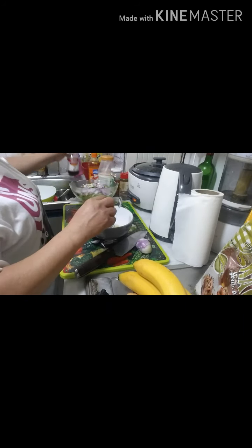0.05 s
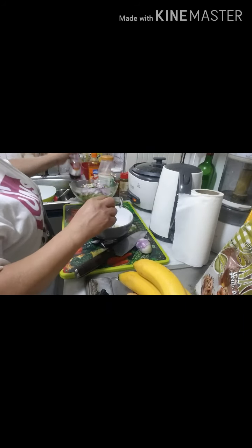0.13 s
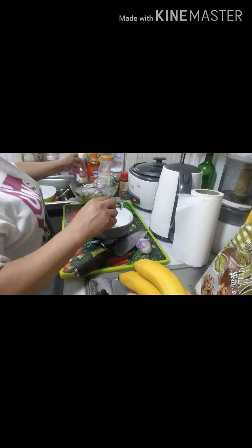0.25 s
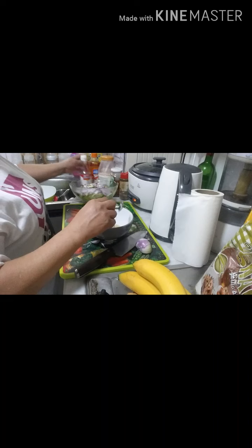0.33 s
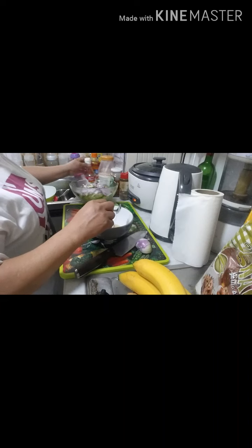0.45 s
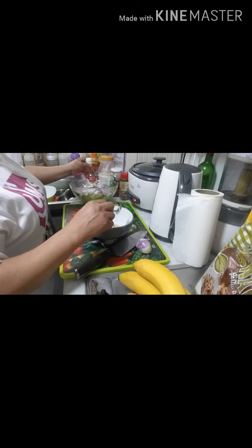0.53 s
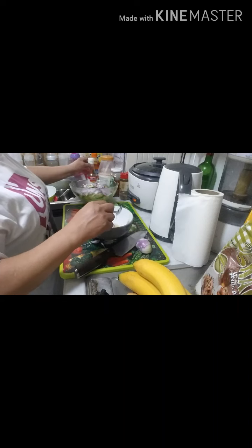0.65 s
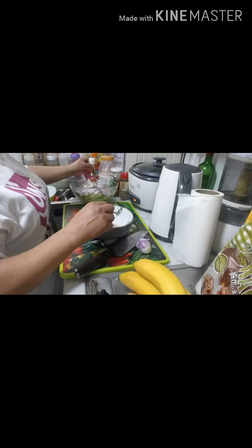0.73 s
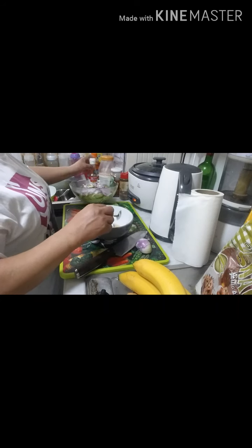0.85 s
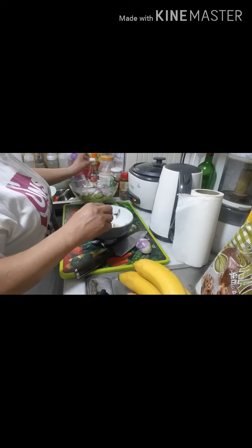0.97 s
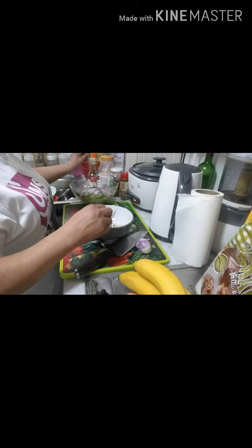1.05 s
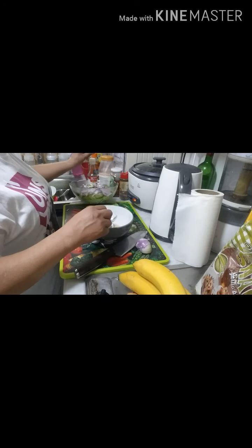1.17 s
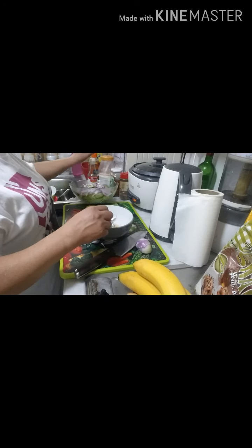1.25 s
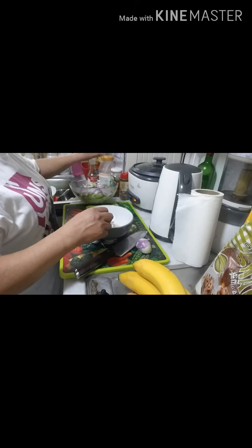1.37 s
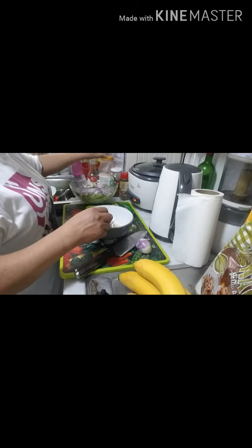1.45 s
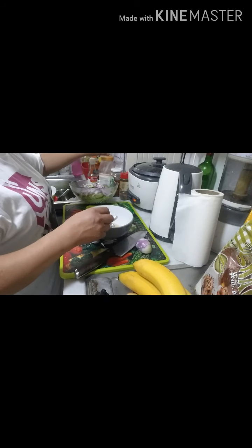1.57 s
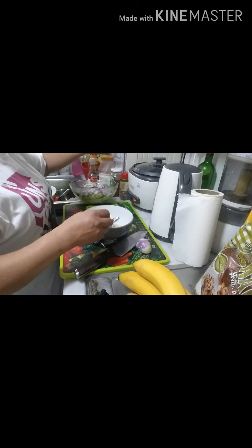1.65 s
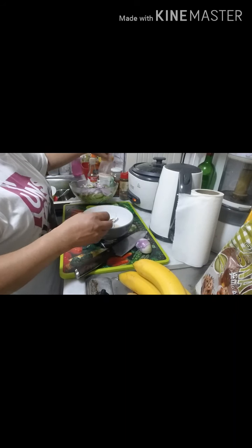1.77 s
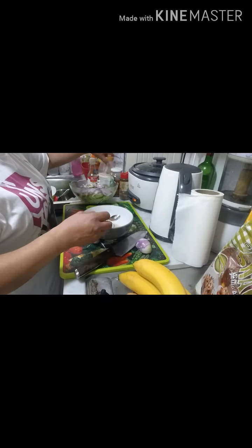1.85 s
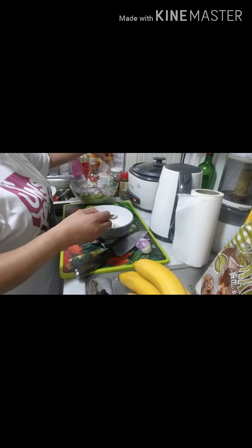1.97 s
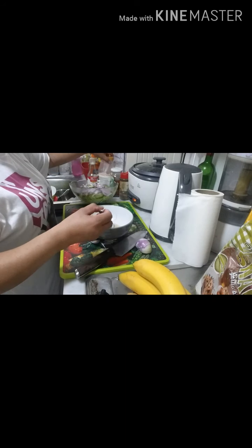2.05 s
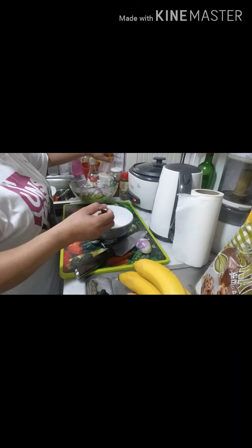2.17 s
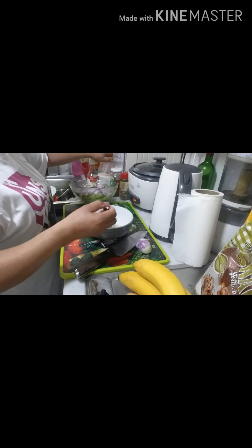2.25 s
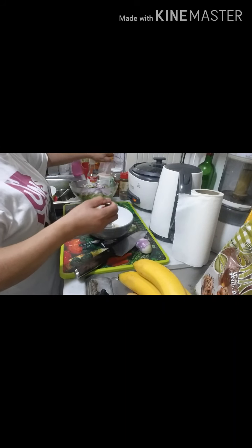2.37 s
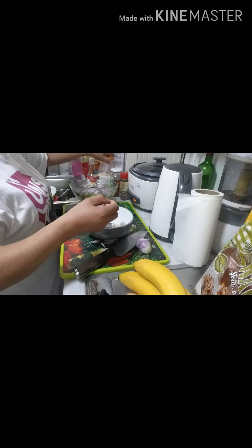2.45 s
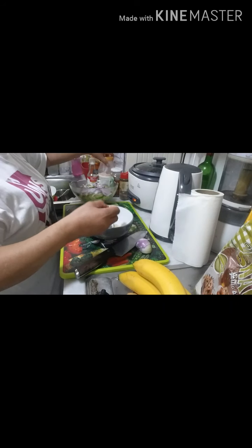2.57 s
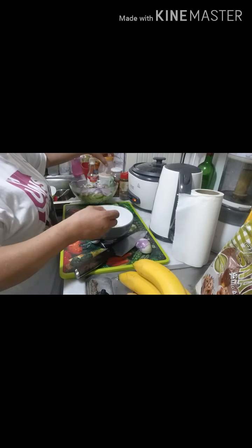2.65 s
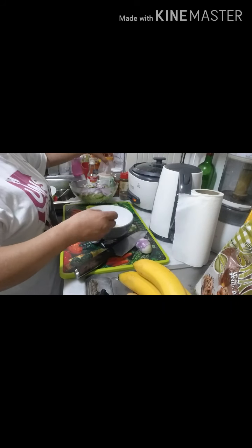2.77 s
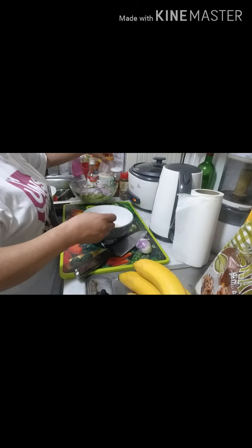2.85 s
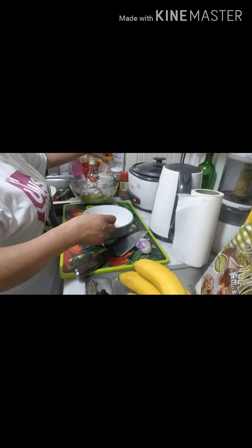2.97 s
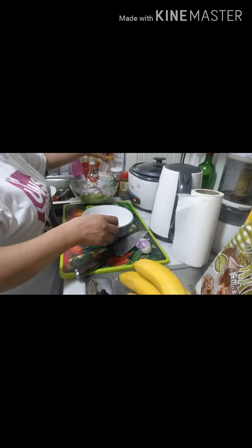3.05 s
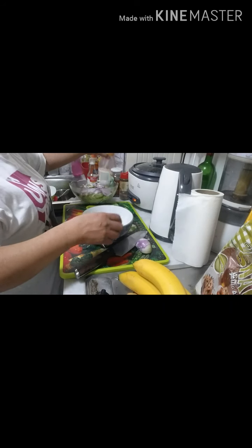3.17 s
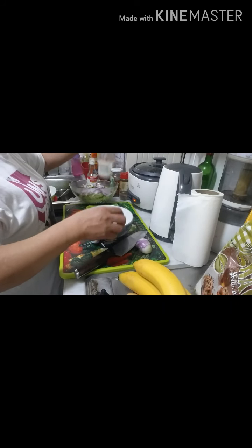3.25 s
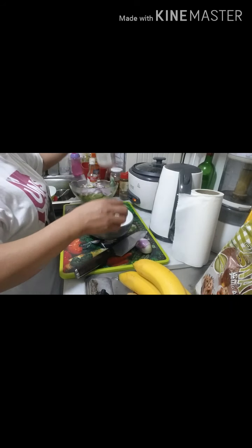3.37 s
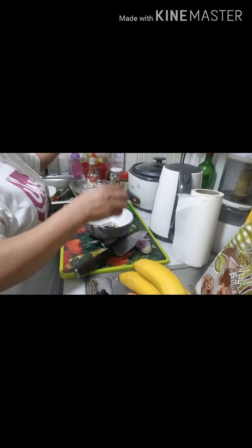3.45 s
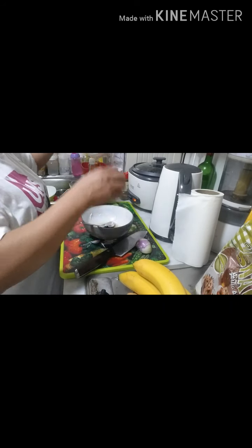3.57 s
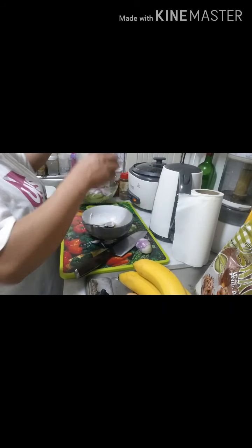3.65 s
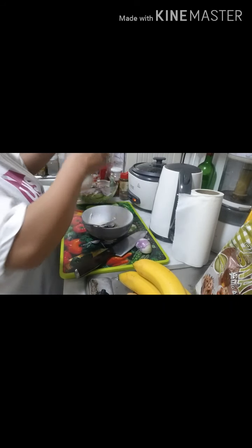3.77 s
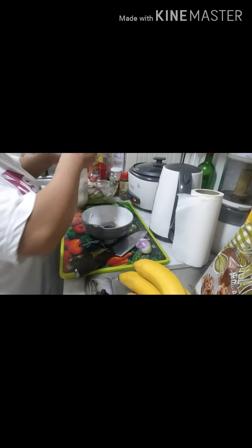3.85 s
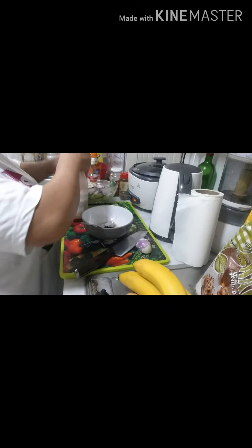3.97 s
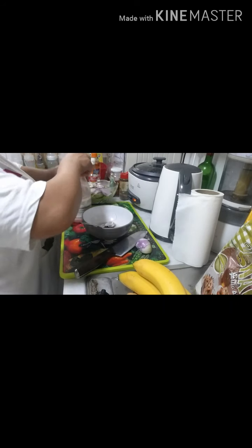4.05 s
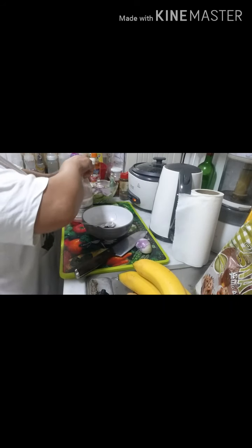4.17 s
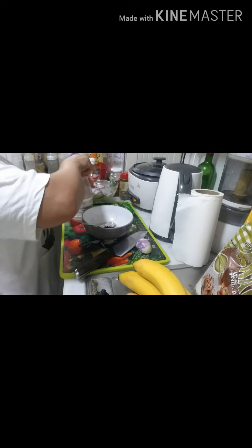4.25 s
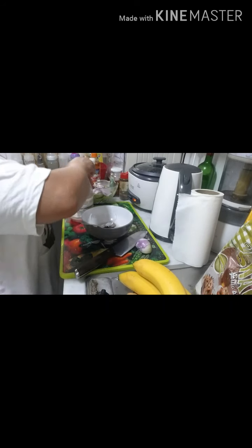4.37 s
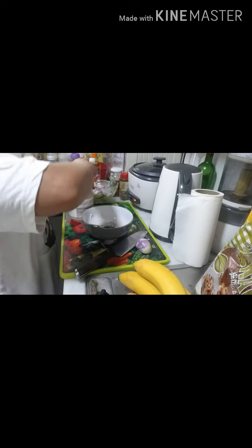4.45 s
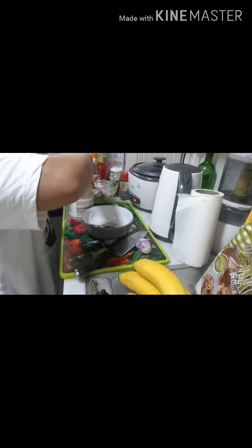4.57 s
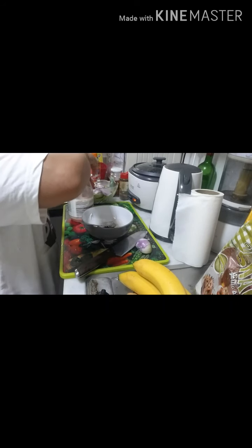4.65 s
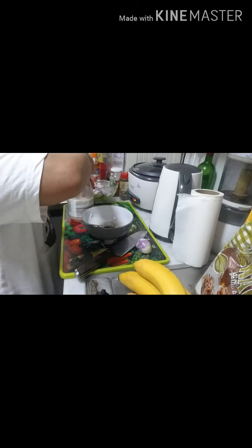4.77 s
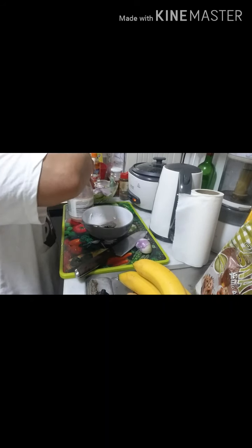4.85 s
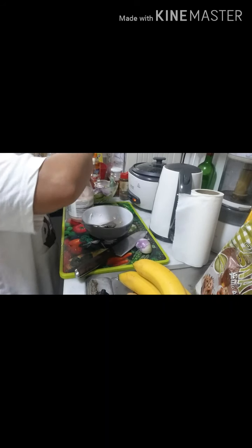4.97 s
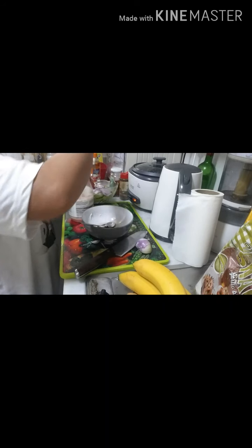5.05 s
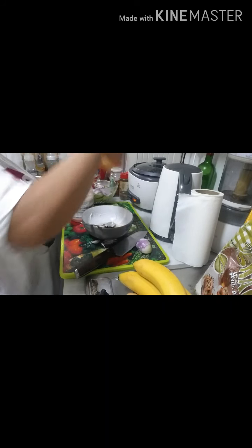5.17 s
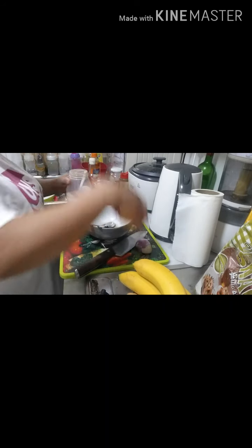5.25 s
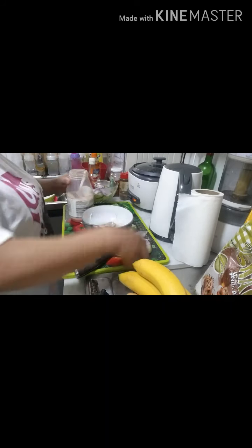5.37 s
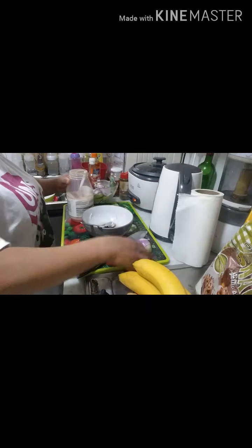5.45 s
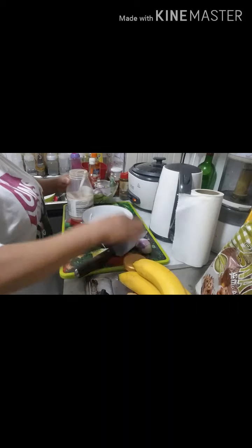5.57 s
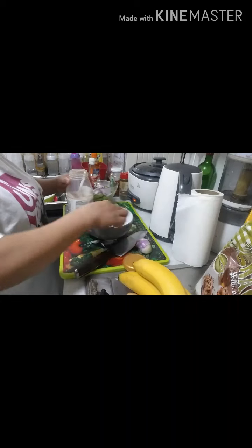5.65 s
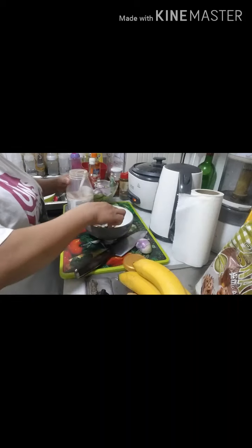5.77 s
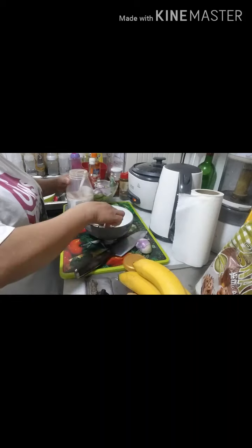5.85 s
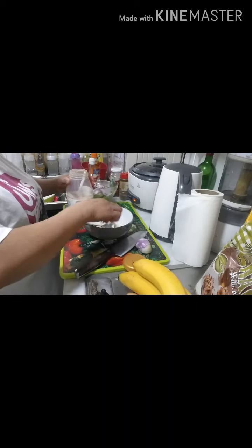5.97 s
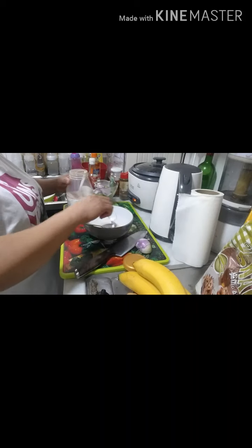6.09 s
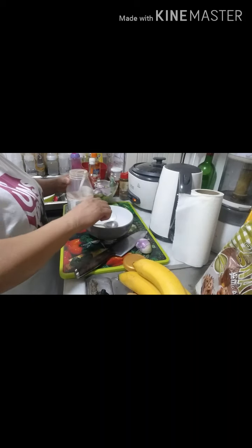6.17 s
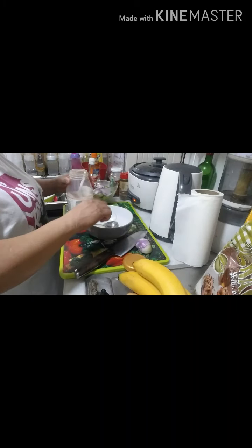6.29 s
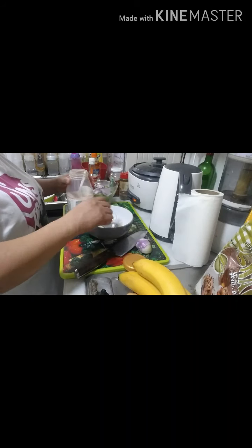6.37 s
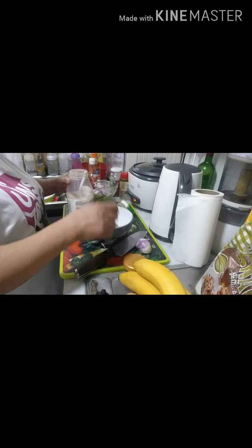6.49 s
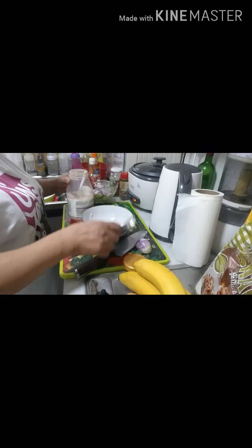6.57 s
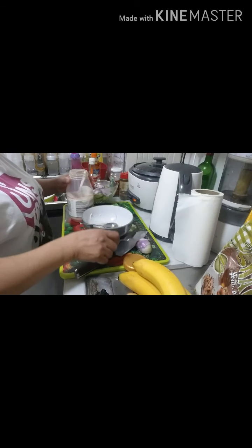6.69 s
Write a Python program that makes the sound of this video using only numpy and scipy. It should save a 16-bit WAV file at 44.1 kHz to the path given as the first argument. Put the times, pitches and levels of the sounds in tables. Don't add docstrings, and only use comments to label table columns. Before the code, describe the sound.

A metal spoon chatters brightly in a glazed bowl, the bowl lands firmly, jars bump and a lid knocks down over a steady appliance hum.

```python
import sys
import numpy as np
from scipy import signal
from scipy.fft import rfft, irfft
from scipy.io import wavfile
from scipy.ndimage import uniform_filter1d

SR = 44100
rng = np.random.default_rng(int(sys.argv[2]) if len(sys.argv) > 2 else 0)


def undo_db(level):
    steps = np.asarray(level, float) / 20
    return 10 ** steps


def file_out(sig):
    cols = np.atleast_2d(sig).T
    lim = np.clip(cols, -1, 1)
    pcm = np.round(lim * 32767).astype(np.int16)
    wavfile.write(sys.argv[1], SR, pcm)


N = 296604


def evened(x):
    return x / np.sqrt(np.mean(x ** 2) + 1e-20)


def read(points, hz):
    f, value = np.transpose(points)
    return np.interp(np.log(hz + 1), np.log(f + 1), value)


def add(mix, s, sound):
    part = mix[..., round(s * SR):][..., :sound.shape[-1]]
    part += sound[..., :part.shape[-1]]


def colour(points, tilt_db=0., body_hz=1000., body_db=0.):
    hz = np.fft.rfftfreq(2048, 1 / SR)
    level_db = read(points, hz) + tilt_db * np.log2(np.clip(hz, 200, 12000) / 2000)
    level_db += body_db / (1 + ((hz - body_hz) / (body_hz / 5)) ** 2)
    cepstrum = irfft(np.log(undo_db(np.maximum(level_db, -100))))
    cepstrum[1:1024] *= 2
    cepstrum[1025:] = 0
    taps = irfft(np.exp(rfft(cepstrum)))[:1024]
    return taps / np.linalg.norm(taps)


def chatter(t60, spread_db=1.5, rise=0.0015):
    t = np.arange(round(.4 * SR)) / SR
    uneven_db = spread_db * np.minimum(rng.exponential(1, len(t)), 5)
    ticks = rng.standard_normal(len(t)) * undo_db(uneven_db)
    return evened(ticks) * undo_db(-60 * t / max(t60, .003)) * (1 - np.exp(-t / rise))


def stroke_db(t, start, length, rise_db, in_db_per_s, out_db_per_s):
    climb = rise_db * (np.clip((t - start) / max(length, .001), 0, 1) - 1)
    set_in = in_db_per_s * np.maximum(start - t, 0)
    let_go = out_db_per_s * np.maximum(t - start - length, 0)
    return climb - set_in - let_go


def knocks(events, points, rise, blow, hollow_db, tilt_db):
    out = np.zeros(N)
    for s, peak_db, rattle_s, body_hz in events:
        drive = chatter(rattle_s, rise=rise)
        drive[20] += blow * np.linalg.norm(drive)
        bright_db = tilt_db + 1.5 * np.log2(body_hz / 1000)
        body = colour(points, bright_db, body_hz, hollow_db)
        add(out, s, undo_db(peak_db - 6.0) * signal.fftconvolve(drive, body))
    return out


# pitch_hz, likeness_0_to_1
LIKENESS = [(100, 1), (500, 0.78), (1000, 0.28), (2000, 0.0074)]


def alike(left, right, hz):
    same = np.clip(read(LIKENESS, hz), -1, 1)[:, None]
    return same * left + np.sqrt(1 - same ** 2) * right


# shaft_beats, level_db (rms), left_right_db
HUM_LINES = [(0, -36.5, -3.5), (1, -55.5, -1), (1.999, -44.5, -4), (3.001, -49.5, 2), (3.998, -79, 2)]
# pitch_hz, level_db (per Hz)
AIR_COLOUR = [(12, -55), (20, -27), (43, -24), (71, -4.5), (108, -20), (189, -15), (404, -28), (521, -32.5),
              (2010, -43), (2370, -35.5), (3330, -46), (5210, -48.5), (10200, -46.5), (15200, -51.5),
              (16500, -82)]
# pitch_hz, width_hz, level_db (over the air)
VENT_WHISTLES = [(2600, 430, 3.5), (5220, 370, 10.5), (6660, 320, 7.5), (10300, 220, 4)]


def compressor():
    mains_hz, beat_hz, air_db = 99.96, 16.18, -46
    t = np.arange(N) / SR
    hum = np.zeros((2, N))
    for beats, db, pan_db in HUM_LINES:
        level = undo_db(db + np.array([[pan_db], [-pan_db]]) / 2) * np.sqrt(2)
        hum += level * np.sin(2 * np.pi * ((mains_hz + beats * beat_hz) * t + rng.random()))
    frames, hz = N // 256 + 5, np.fft.rfftfreq(1024, 1 / SR)
    a, b, c, d, patches = rng.standard_normal((frames, 513, 5)).T
    patches = evened(uniform_filter1d(uniform_filter1d(patches, 14, 0), 12, 1))
    whistle_db = sum(db / (1 + ((hz - f) / (width / 2)) ** 2) for f, width, db in VENT_WHISTLES)
    left = a + 1j * b
    z = np.array([left, alike(left, c + 1j * d, hz)])
    z *= undo_db((read(AIR_COLOUR, hz) + whistle_db)[:, None] + 0.5 * patches)
    air = signal.istft(z, nperseg=1024, noverlap=768)[1][:, :N]
    return hum + undo_db(air_db) * evened(air)


# pitch_hz, t60_s
ROOM_DECAY = [(150, 0.34), (600, 0.2), (2000, 0.19), (5000, 0.23), (12000, 0.2)]


def kitchen(x):
    room_db, spacing = 4, 16
    slots = np.arange(300, SR // 2 - spacing, spacing)
    at = slots + rng.integers(0, spacing, (2, len(slots)))
    taps = np.zeros((2, SR // 2))
    np.put_along_axis(taps, at, rng.choice([-1., 1.], at.shape), 1)
    hz, t, z = signal.stft(taps, SR, nperseg=256)
    z[1] = alike(z[0], z[1], hz)
    tail = signal.istft(z * undo_db(-60 * t / read(ROOM_DECAY, hz)[:, None]), SR, nperseg=256)[1]
    power = abs(rfft(tail)) ** 2
    even = uniform_filter1d(power, size=400) / uniform_filter1d(power, size=30)
    tail = irfft(rfft(tail) * np.sqrt(even), tail.shape[1])[:, :SR // 3]
    tail = tail / np.linalg.norm(tail[0])
    return x + undo_db(room_db) * signal.fftconvolve(x, tail, axes=1)[:, :N]


# start_s, peak_db, t60_s
WORKTOP_PUSHES = [
    (0.64, -18, 0.09),
    (2.595, -28, 0.16),
    (4.163, -11.5, 0.15),
]


def thuds():
    out, t = np.zeros(N), np.arange(SR // 3) / SR
    for s, peak_db, t60 in WORKTOP_PUSHES:
        swell = 1 - np.exp(-t / 0.013)
        add(out, s, undo_db(peak_db - 60 * t / t60) * swell * np.sin(2 * np.pi * 140 * t))
    return out


# start_s, peak_db, rattle_t60_s, body_hz
JAR_NUDGES = [(.01, -47, 0.22, 255), (.36, -54, 0.2, 704), (.565, -45.5, 0.12, 3750),
              (.655, -23.5, 0.03, 530), (.668, -28, 0.026, 990), (.901, -32, 0.1, 530),
              (.916, -29.5, 0.065, 1000), (.925, -38.5, .057, 1960), (2.089, -46, .055, 3560),
              (2.31, -36.5, 0.068, 576), (2.335, -49, .05, 6000), (3.19, -41.5, 0.1, 670),
              (4.53, -47, .044, 880), (4.557, -37.5, 0.15, 1060), (4.628, -30, 0.025, 420),
              (4.83, -40, .05, 370), (4.988, -29.5, .024, 420), (6.702, -51, .08, 600)]
# start_s, peak_db, rattle_t60_s, body_hz
FINGER_TAPS = [(.195, -44, 0.075, 1350), (.486, -45, 0.1, 1310), (.63, -33, 0.042, 4000),
               (.701, -50, .029, 526), (1.005, -40, .072, 690), (1.94, -47, .065, 730),
               (2.165, -43, 0.11, 480), (2.268, -49, 0.32, 2430), (2.589, -39.5, 0.045, 1130),
               (3.4, -30.5, 0.08, 380), (4.812, -27.5, .041, 950), (4.97, -28, 0.071, 859)]
# pitch_hz, level_db (per Hz)
JAR_COLOUR = [(150, -31.5), (250, -3.5), (547, -7), (651, -4.5), (1010, -9), (2240, -16.5), (2810, -18),
              (3980, -25), (6940, -27.5), (14900, -47), (16000, -65)]


def jars():
    hollow = knocks(JAR_NUDGES, JAR_COLOUR, 0.00098, 0.16, hollow_db=13, tilt_db=-0.1)
    fingers = knocks(FINGER_TAPS, JAR_COLOUR, 0.0011, 0.15, hollow_db=0.5, tilt_db=0.9)
    return undo_db(3.5) * (hollow + fingers)


# start_s, length_s, level_db, tightening_db, brightness_db_per_octave
LID_TURNS = [
    (4.425, 0.2, -41, 6.5, 1.7),
    (4.81, 0.11, -39, 1.9, 2.3),
    (4.962, .032, -42.5, 9.2, 0.6),
]
# pitch_hz, level_db (per Hz)
THREAD_COLOUR = [ (240, -26.5), (400, -2), (425, -4), (512, -17), (742, -8), (1090, -2), (1220, -13),
                 (1710, -0.5), (6950, -15.5), (15000, -23), (16000, -26)]


def lid_turning():
    out = np.zeros(N)
    for s, length, level_db, tighten_db, tilt_db in LID_TURNS:
        t = np.arange(-.02, .4, 1 / SR)
        grains = rng.standard_normal(len(t)) * undo_db(1.4 * rng.exponential(1, len(t)))
        rub = signal.fftconvolve(evened(grains), colour(THREAD_COLOUR, tilt_db))[:len(t)]
        grip_db = stroke_db(t, 0, length, tighten_db, in_db_per_s=3000, out_db_per_s=551.5)
        add(out, s + t[0], undo_db(level_db + tighten_db - 11.0 + grip_db) * rub)
    return out


# start_s, peak_db, rattle_t60_s, body_hz
LID_HITS = [
    (5.5105, -3, 0.022, 1270),
    (5.5195, -5, 0.014, 1200),
    (5.513, -14.5, 0.024, 410),
]
# pitch_hz, level_db (per Hz)
LID_COLOUR = [(150, -36.5), (270, -21), (420, -4), (800, -14.5), (1350, -2.5), (2200, -6), (6200, -16),
              (9000, -24.5), (12600, -41), (16000, -61)]


def lid_set_down():
    return knocks(LID_HITS, LID_COLOUR, 0.00031, 0.37, hollow_db=8.5, tilt_db=0.5)


# start_s, peak_db, rattle_t60_s, body_hz
BOWL_HITS = [
    (4.152, -4.5, 0.015, 1060),
    (4.1605, -1.5, 0.02, 1240),
    (4.177, -13, 0.025, 308),
]
# pitch_hz, level_db (per Hz)
COUNTER_COLOUR = [(53, -64), (90, -18), (135, -11), (214, -14), (551, -7.5), (694, -4), (1240, -10.5),
                  (2000, -12), (4330, -18), (4950, -20), (9000, -37), (11700, -35), (19800, -120)]


def bowl_set_down():
    return knocks(BOWL_HITS, COUNTER_COLOUR, 0.00057, 0.6, hollow_db=7, tilt_db=0.45)


# start_s, peak_db, swell_s, hold_s
RIM_DRAGS = [
    (2.97, -41, 0.014, .075),
    (3.112, -27, 0.15, 0.076),
    (3.385, -47, .012, 0.086),
    (5.999, -46, .022, 0.082),
    (6.294, -27.5, 0.032, .004),
    (6.357, -25, 0.04, 0.0043),
    (6.438, -39, 0.042, 0.041),
]
MODE_HZ = [1036, 2080, 2491, 3800, 4307, 4390, 5640, 6003, 6243, 6459, 6757, 6980, 7650, 8872, 9220, 9560,
           10150, 10330, 11553, 11744, 12300, 12600, 13200, 14150, 14500, 14948, 15339, 4497, 6558, 7690]


def low_ring():
    t = np.arange(N) / SR
    levels_db = []
    for s, peak_db, swell, hold in RIM_DRAGS:
        held = t - np.clip(t - s - swell, 0, hold)
        levels_db.append(peak_db + stroke_db(held, s, swell, 23.5, in_db_per_s=3000, out_db_per_s=428))
    level_db = np.max(levels_db, axis=0)
    waver = 0.71 * evened(uniform_filter1d(rng.standard_normal(N), 900))
    lead = np.array([[.6], [0]])
    return undo_db(level_db + 2.5) * np.sin(2 * np.pi * MODE_HZ[0] * t + waver + lead)


# start_s, peak_db, chatter_t60_s, brightness_db_per_octave
SPOON_CONTACTS = [(2.9698, -4.5, 0.082, 2), (3.01, -12, 0.1, -2.5), (3.1043, -9, 0.16, -3.3),
                  (3.1289, -9.5, 0.15, 6.5), (3.1716, -9.5, .043, 0.3), (3.2124, 1, 0.04, 2.5),
                  (3.2499, -5.5, 0.087, 0.2), (3.287, -5, .081, 6.5), (3.3294, -7, 0.072, 1.5),
                  (3.3795, -8.5, 0.067, 0.5), (3.451, -13, .17, -1.3), (4.166, -9, 0.18, 3.1),
                  (4.1886, -11, 0.11, -2.5), (4.2144, -19, 0.072, -7), (5.915, -39.5, 0.11, -6),
                  (5.934, -35.5, 0.088, -5), (6.0123, -24, 0.11, -2), (6.0817, -15, 0.19, -2.5),
                  (6.0946, -16.5, 0.12, -3), (6.1291, -18, .14, -3), (6.182, -28.5, 0.2, -5),
                  (6.2631, -26.5, 0.098, -5.5), (6.2924, -26.5, 0.4, -4), (6.318, -3, 0.13, 0.3),
                  (6.3405, -6.5, 0.17, 0), (6.3805, -3.5, 0.154, 1.4), (6.404, -18, 0.065, 3),
                  (6.44, -17, 0.11, -2.5)]
# level_db, t60_s, left_right_db
MODES = [(-10, 0.05, 5), (-41, 0.11, -15), (-1.5, 0.067, -1.5), (-39, 0.057, 6), (5.5, 0.079, -2.5),
         (3, 0.078, -4), (-30, .1, -10), (-34, 0.14, 12), (-16, 0.05, 33), (-5, 0.12, -10.5),
         (-7, 0.11, -3), (-27, 0.085, -26), (-11, 0.05, -1), (-2, 0.1, -3), (-14.5, 0.25, 13),
         (-21, 0.17, -7), (-47, 0.07, 0.1), (-6, 0.13, -1.5), (-6, 0.06, 0), (-24, 0.12, -3), (-25, .1, 23),
         (-10, 0.17, 3), (-34, .08, 2), (-12, 0.059, -2), (-9.5, 0.07, -5), (-35, 0.11, -4),
         (-18, 0.07, -11), (-24, .1, 9), (-14, 0.15, -3), (-14.5, 0.1, -5)]
# pitch_hz, lead_rad
PORT_LEAD = [(700, 0), (1036, .5), (2491, 3.5), (4307, 1.6), (6459, 4.3), (8872, 1.7), (15000, 3)]
# pitch_hz, level_db (per Hz)
CLACK_COLOUR = [(300, -38), (700, -23.5), (1400, -16), (2150, -19), (2800, -7.5), (3300, -13.5),
                (4300, -14.5), (5100, -22), (6500, -8), (8200, -16.5), (10000, -9.5), (15500, -28.5)]


def spoon():
    clack_db, ring_db = -17 + 3.0, -39.5
    hz = np.array(MODE_HZ)[:, None]
    db, t60, pan_db = np.transpose(MODES)[:, :, None]
    t = np.arange(round(.4 * SR)) / SR
    ring, clack = np.zeros((2, N)), np.zeros(N)
    start = 2 * np.pi * rng.random(hz.shape) + np.array([read(PORT_LEAD, hz), 0 * hz])
    t60[2] = min(t60[2, 0], .08)
    t60 = np.minimum(t60, 1200 / hz)
    fades = undo_db(-60 * t / t60) * undo_db(np.array([pan_db, -pan_db]) / 2)
    spots = rng.standard_normal((len(SPOON_CONTACTS), len(MODES))) * (hz.T > 5000)
    for (s, peak_db, rattle_s, tilt_db), spot in zip(SPOON_CONTACTS, spots):
        share_db = db[:, 0] + tilt_db * np.log2(hz[:, 0] / 4300) + 3.5 * spot
        share_db[2] += 4.5
        detuned = hz * (1 + .012 * spot[::-1, None] * (hz > 7000))
        rings = fades * np.sin(2 * np.pi * detuned * t + start)
        drive = chatter(rattle_s, spread_db=3.5, rise=0.0026)
        dry_db = 6 * np.log2(0.11 / rattle_s)
        hit = signal.fftconvolve(drive, colour(CLACK_COLOUR, tilt_db))
        add(clack, s, undo_db(peak_db + clack_db + dry_db) * hit)
        drive[20] += 0.69 * np.linalg.norm(drive)
        struck = signal.fftconvolve(drive[None], undo_db(share_db) @ rings, axes=1)
        add(ring, s, undo_db(peak_db + ring_db) * struck)
    return ring, clack


def scene():
    ring, clack = spoon()
    dull = clack + bowl_set_down() + lid_set_down() + jars() + lid_turning()
    late = np.roll(dull, 6)
    share = undo_db(-4)
    in_room = kitchen(share * ring + np.array([late, dull]))
    return (1 - share) * ring + in_room + low_ring() + thuds() + compressor()


def band_limit(x):
    return signal.sosfilt(signal.butter(12, 16820, fs=SR, output="sos"), x)


# pitch_hz, left_right_db
PORT_COLOUR = [(300, -1.5), (1000, -0.5), (2500, -0.7), (4300, -6), (5500, -5.5), (6500, -11.5), (8800, 1),
               (12000, -4.5)]


def record(dry):
    edge_hz, recovery_db_per_s, threshold_db, duck_share = 15900, 28.0, -20.5, 0.28
    hz = np.fft.rfftfreq(N, 1 / SR)
    balance_db = read(PORT_COLOUR, hz) / 2
    ports = undo_db(np.array([balance_db, -balance_db])) / (1 + (hz / edge_hz) ** 60)
    x = irfft(rfft(dry) * ports, N)
    power_db = 10 * np.log10(abs(uniform_filter1d((x ** 2).mean(0), 800)) + 1e-12)
    fall = np.arange(N) * recovery_db_per_s / SR
    held_db = np.maximum.accumulate(power_db + fall) - fall
    over_db = np.maximum(held_db - threshold_db, 0)
    return band_limit(x / undo_db(duck_share * uniform_filter1d(over_db, 400)))


dry = scene()
out = record(dry)
file_out(out)
```